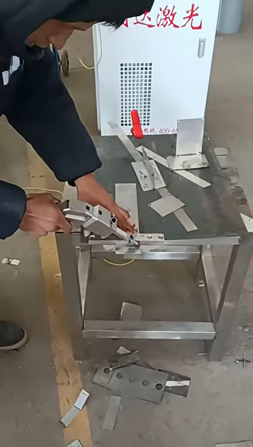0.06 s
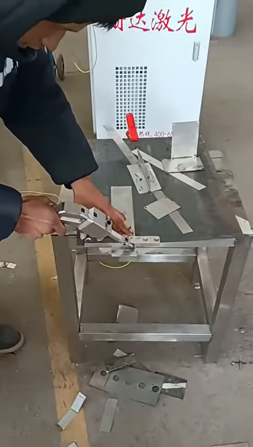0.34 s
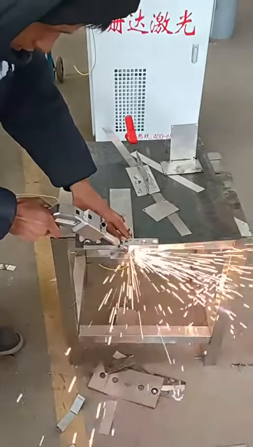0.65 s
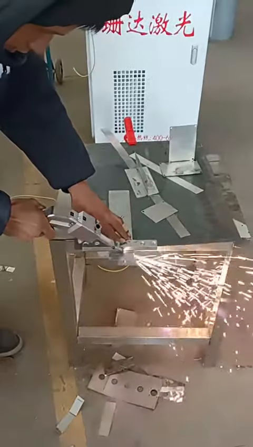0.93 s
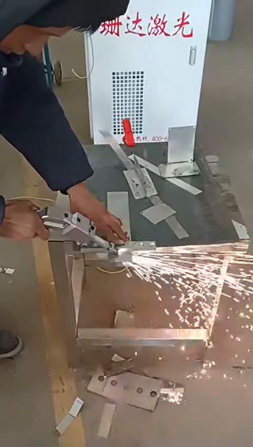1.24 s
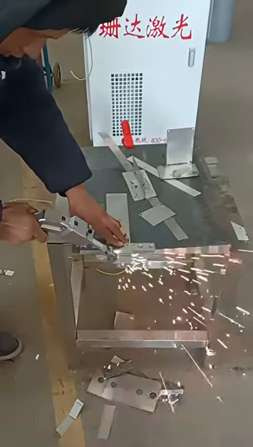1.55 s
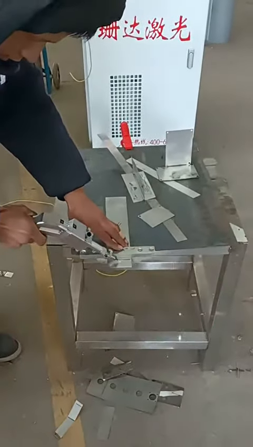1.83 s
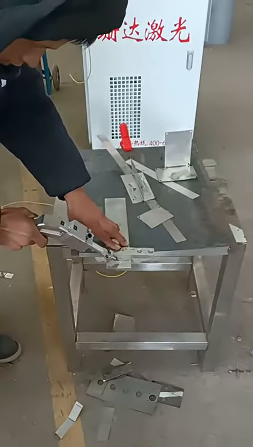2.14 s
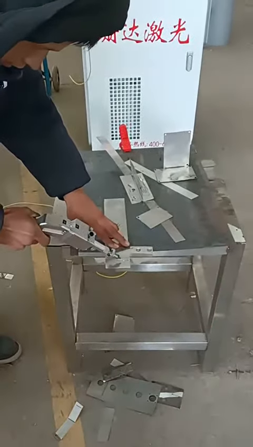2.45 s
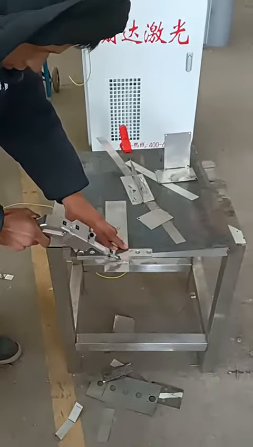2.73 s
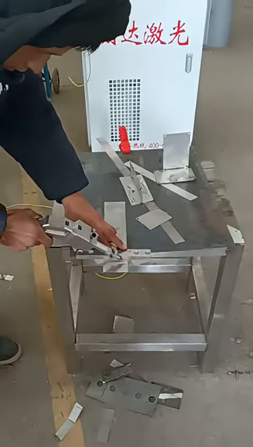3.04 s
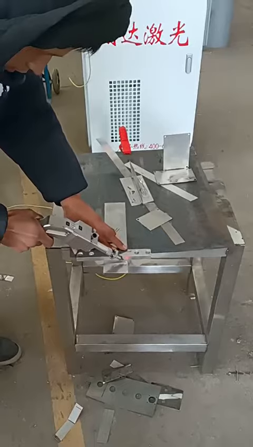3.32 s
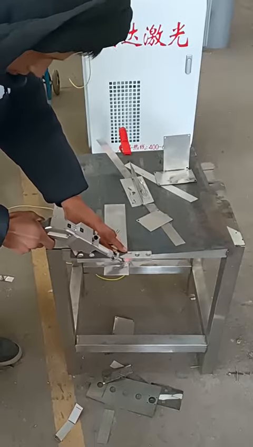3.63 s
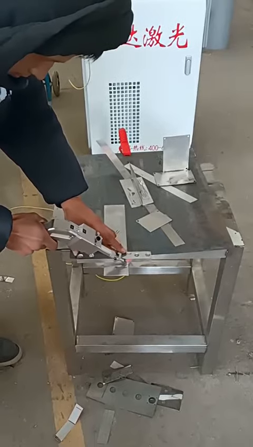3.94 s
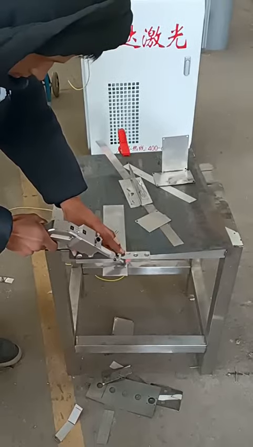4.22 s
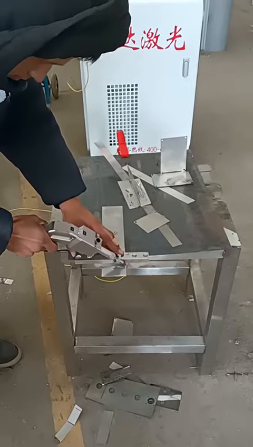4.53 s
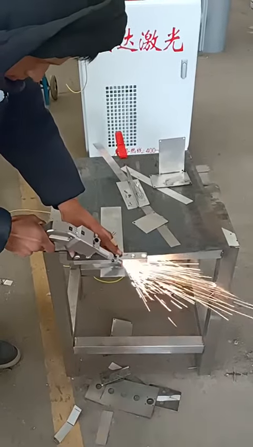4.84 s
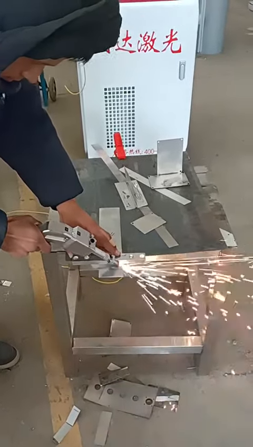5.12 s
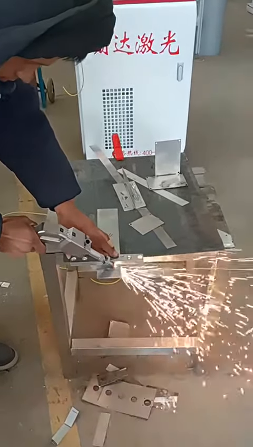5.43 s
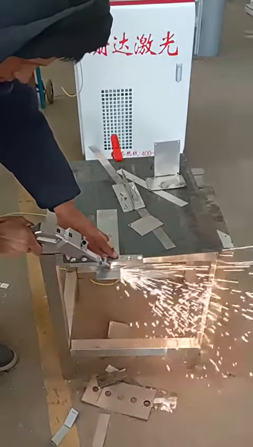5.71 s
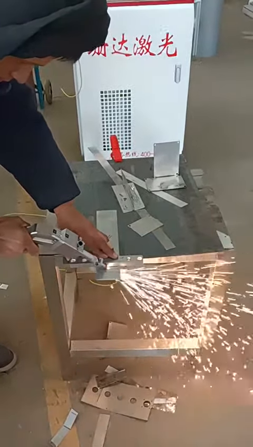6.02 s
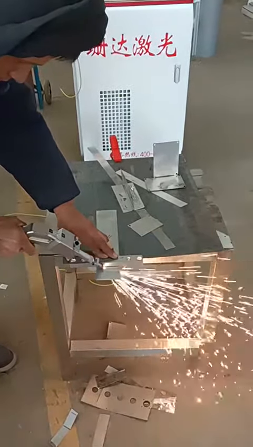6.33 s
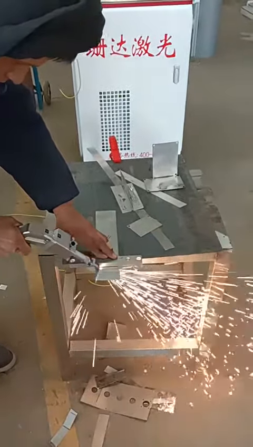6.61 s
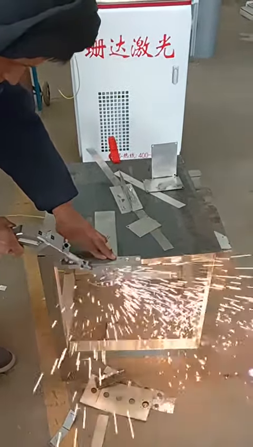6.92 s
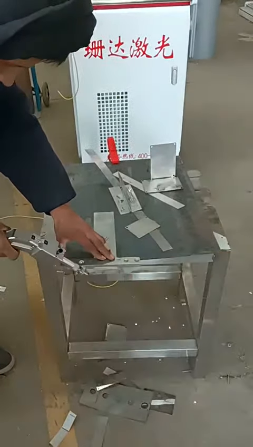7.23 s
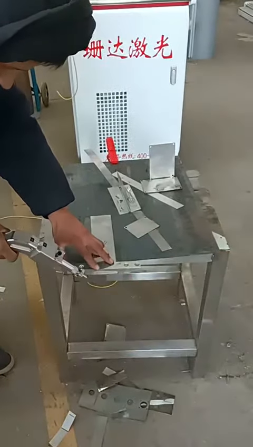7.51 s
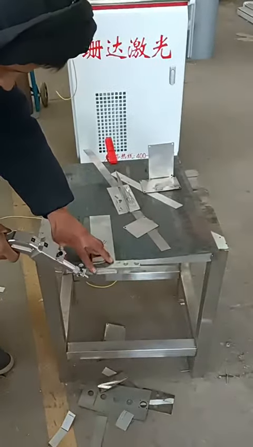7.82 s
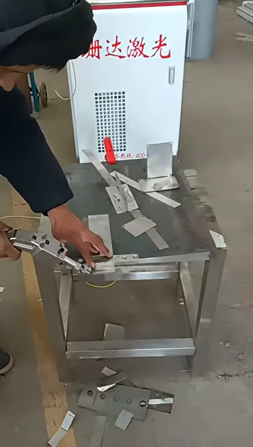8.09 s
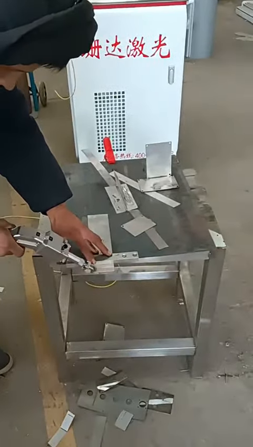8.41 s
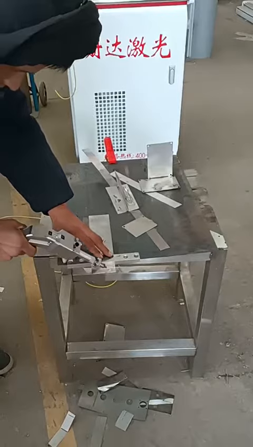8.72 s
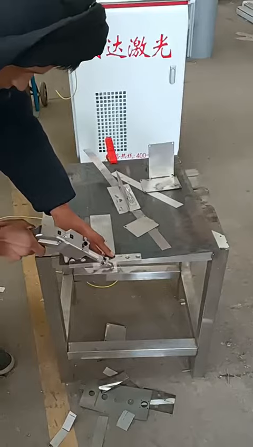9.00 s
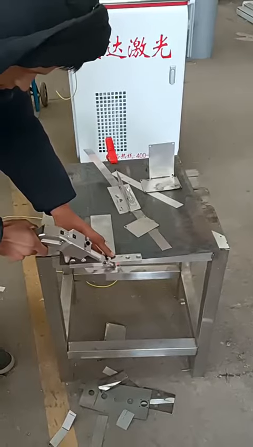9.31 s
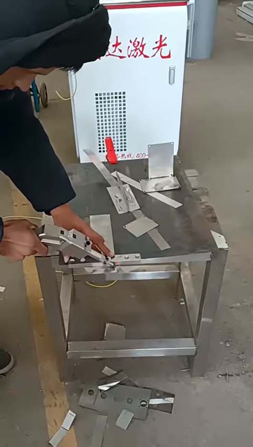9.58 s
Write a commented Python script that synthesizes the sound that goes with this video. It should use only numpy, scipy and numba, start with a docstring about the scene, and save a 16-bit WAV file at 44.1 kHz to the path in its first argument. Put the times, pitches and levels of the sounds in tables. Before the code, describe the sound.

A handheld laser cutter hisses loudly through steel in two passes, then a metal offcut clatters onto concrete over a steady workshop hum.

```python
"""On a workshop bench, a handheld laser cuts a steel strip in two passes, heard from a phone above it.
Turbulent assist gas hisses from the nozzle, roars through the melt, excites the resonances of the kerf
and throws sparks. The freed offcut drops on the concrete and rings in its bending modes as it bounces,
ducking the phone's limiter. The laser's cooler hums throughout."""
import sys
import numpy as np
from scipy import signal
from scipy.fft import rfft, irfft, next_fast_len
from scipy.io import wavfile
from scipy.ndimage import uniform_filter1d, minimum_filter1d
from numba import njit

SR = 44100
rng = np.random.default_rng(int(sys.argv[2]) if len(sys.argv) > 2 else 0)


def output_pcm(signal):
    """Save a mono or channel-first signal as 16-bit PCM at the path in sys.argv[1].

    Samples are clipped to [-1, 1] before scaling.
    """
    pcm = np.clip(np.atleast_2d(signal).T, -1, 1) * 32767
    wavfile.write(sys.argv[1], SR, np.round(pcm).astype(np.int16))


N = 429975
T, FREQ = np.arange(N) / SR, np.maximum(np.fft.rfftfreq(next_fast_len(N + SR, True), 1 / SR), 1)

# Levels in the tables are relative.
# spectrum of the cooler fans and workshop air: frequency_hz, density_db
FAN_SPECTRUM = [(25, -23), (70, -8.5), (150, -1), (270, -0.5), (450, -14.5), (620, -15), (790, -17.5),
                (1030, -16), (1500, -23.5), (2200, -24), (3200, -32.5), (4650, -24), (5500, -33),
                (7500, -62), (16000, -66.5)]
# lines of the compressor hum: pitch_hz, level_db
HUM_LINES = [(108.6, -51.5), (108.3, -68.5), (101, -62), (180, -63.5)]
# colour difference of the two microphone ports: frequency_hz, left_minus_right_db
PORT_BALANCE = [(100, 0), (200, -3), (650, 1), (1300, -1), (2300, -5.5), (3100, -0.5), (4200, -8.5),
                (5200, -15), (6200, -3), (7500, -2), (8800, 9.5), (11000, -2), (15000, 2)]
# likeness of left and right for near sources: frequency_hz, coherence_ratio
NEAR_COHERENCE = [(200, 1), (700, 0.7), (1500, 0.44), (4000, 0.66), (9000, 0.38)]
# likeness of left and right for the diffuse hall: frequency_hz, coherence_ratio
DIFFUSE_COHERENCE = [(30, 0.83), (100, 0.92), (290, 0.95), (640, 0.46), (1500, 0.02), (5000, 0)]
# spectrum of the trigger click: frequency_hz, density_db
TRIGGER_SPECTRUM = [(200, -9), (550, 3), (1200, -8), (2300, 5), (3100, -6), (4200, -3), (6000, -15),
                    (9000, -28), (16000, -45)]
# touches of the nozzle on the strip: start_s, level_db, decay_s
NOZZLE_TOUCHES = [(2.68, -57, 0.075), (2.769, -57, 0.023), (3.392, -52.5, 0.026), (8.777, -61, .008)]
# bending modes of the offcut: pitch_hz, level_db, t60_s
OFFCUT_MODES = [(1201, -22, 0.82), (1518, -17, 0.14), (1790, -23, 0.26), (1940, -17.5, 0.14),
                (2100, -20, 0.15), (2173, -4.5, 0.15), (2372, -2.5, 0.11), (2487, -0.5, 0.13),
                (2790, -8.5, .2), (3114, -1.5, 0.32), (3200, -2.5, 0.18), (3400, -2, 0.39),
                (3500, 3.5, 0.18), (3560, -3, 0.86), (4020, 1.5, 0.15), (4100, 0, 0.11), (4270, 0.5, 0.17),
                (4415, -2, 0.13), (4620, -9, 0.2), (4780, -1.5, 0.18), (4860, -8, 0.4), (4950, -5, 0.18),
                (5270, -2.5, 0.16), (5710, -3, 0.18), (6015, -4.5, 0.25), (6580, -14, 0.2),
                (6950, -21, 0.17), (8850, -30.5, 0.32)]
# landings of the offcut: start_s, level_db, chatter_decay_s, favoured_mode_hz, mode_rise_db
LANDINGS = [(7.191, -4, 0.0092, 5710, 6), (7.201, -7, 0.025, 3200, 7), (7.213, -13, 0.027, 4780, 8),
            (7.246, -5, 0.037, 4100, -1), (7.276, -11, 0.018, 2372, 14.5), (7.285, -22, 0.015, 1201, 26),
            (7.307, -15, 0.02, 3400, 18), (7.318, -7.5, 0.028, 4100, 5), (7.338, -14.5, 0.021, 2487, 7),
            (7.357, -14, 0.02, 3400, 16), (7.372, -11.5, 0.018, 4780, 9), (7.424, -34.5, 0.007, 1790, 41),
            (7.477, -25, 0.02, 6015, 27), (7.484, -17, 0.015, 3560, 22), (7.49, -6.5, 0.029, 2487, 4.5),
            (7.516, -18, 0.023, 5270, 11), (7.56, -16.5, 0.031, 3560, 16.5),
            (7.595, -25, 0.035, 4780, 20.5), (7.716, -20, 0.062, 3114, 10.5),
            (7.729, -22.5, 0.029, 2372, 12), (7.742, -27, 0.026, 6015, 25), (7.762, -20, 0.048, 3114, 3),
            (7.797, -21.5, 0.028, 4270, 10)]
# spectrum of a steel edge scraping concrete: frequency_hz, density_db
SCRAPE_SPECTRUM = [(30, -70.5), (500, -30), (1200, -13), (1800, -5), (2200, 2), (2800, 3.5), (3300, 12.5),
                   (4700, 13.5), (5700, 7), (6600, -3), (8000, -18.5), (11000, -29), (16000, -41)]
# spectrum of the spark fizz, with the microphone's high sheen near 15 kHz: frequency_hz, density_db
FIZZ_AND_SHEEN = [(100, -50), (2000, -18.5), (5000, -8.5), (9000, 15.5), (10500, 8.5), (12500, 2),
                  (13800, -5.5), (15000, 14), (16000, -13.5)]
# sparks thickening into showers: centre_s, rise_db, half_length_s
SPARK_SHOWERS = [(0.44, 9.7, 0.18), (0.83, 20, 0.19), (1.86, 16, 0.041), (5.45, 17.2, 0.36),
                 (7.1, 16.2, 0.61)]
# the two passes: valve_opens_s, beam_bites_s, beam_leaves_s, valve_shuts_s
CUT_PASSES = [(0.267, 0.319, 1.91, 1.977), (4.695, 4.852, 6.875, 7.39)]
# uneven guiding by the hand, one table per pass: time_s, hiss_db, roar_db
HAND_GUIDING = [
    [(0.42, -21, -29), (0.578, -24.5, -28), (0.7, -22.5, -32.5), (1.046, -18.5, -39.5), (1.408, -21, -34),
     (1.558, -19.5, -36), (1.622, -17.5, -27.5), (1.834, -18, -30.5), (1.88, -19.5, -41)],
    [(4.8, -23.5, -26.5), (4.94, -20.5, -26), (5.002, -19.5, -26.5), (5.274, -22.5, -29),
     (5.508, -19.5, -28.5), (5.614, -19.5, -37), (6.0, -19.5, -37.5), (6.08, -20, -32.5),
     (6.598, -24.5, -30.5), (6.85, -24.5, -33)],
]
# the nozzle pressed flat, choking the bleed: centre_s, change_db, half_length_s
BLEED_CHOKES = [(2.87, -17, 0.038), (3.49, -9, 0.035)]
# ripples that the steel bench top lays on the spectrum: frequency_hz, rise_db
BENCH_RIPPLES = [(797, 5.5), (1040, 4.5), (1185, 3), (1486, 7), (1723, 3.5), (2090, 1.5), (2340, 2),
                 (3020, 6), (3338, 6.5), (3625, 7), (3945, 10), (4235, 8), (4600, 7.5), (5025, 7),
                 (5345, 7), (5620, 5.5), (5810, 4.5), (6288, 2.5), (6611, 7), (6920, 2.5)]
# air resonance of the lengthening cut, one table per pass: time_s, pitch_hz, level_over_jet_db
CUT_RESONANCE = [
    [(0.65, 7800, -27), (0.88, 7300, -12), (1.1, 6700, -18), (1.28, 4200, -11), (1.68, 3650, -14.5),
     (1.88, 2950, -13.5)],
    [(5.2, 7400, -28), (5.48, 6900, -13), (5.78, 6400, -9), (6.02, 4200, -8.5), (6.18, 3350, -12),
     (6.42, 2950, -13.5), (6.6, 1465, -10.5), (6.85, 1102, -16.5)],
]
# cavities that change size as the nozzle travels: time_s, slot_pitch_hz, hollow_pitch_hz
CAVITY_PITCHES = [(0.4, 4940, 2350), (0.85, 5070, 2300), (1.25, 5100, 2190), (1.7, 5160, 2080),
                  (1.9, 5470, 2196), (4.85, 4490, 2387), (5.25, 4710, 2315), (5.5, 4740, 2200),
                  (5.75, 5510, 2300), (6.08, 5505, 2216), (6.6, 5330, 2100), (6.88, 5310, 1902),
                  (6.91, 4110, 1907), (7.0, 5210, 2196)]
# swells of the whistle as the jet lines up with the slot: centre_s, rise_db, half_length_s
WHISTLE_SWELLS = [(1.2, 5.4, 0.33), (1.86, 9.6, 0.13), (5.88, 7.6, 0.16), (6.72, 6.1, 0.2)]
# gas spits as the beam pierces and breaks through:
# start_s, level_db, decay_s, squeal_offset_db, spray_offset_db
GAS_SPITS = [(4.834, -16.5, 0.018, -16, -19), (6.889, -12, 0.011, 2.5, -29)]
# spectrum of the turbulence in the kerf: frequency_hz, density_db
ROAR_SPECTRUM = [(30, -33), (250, -12.5), (500, -10.5), (670, -12), (790, -6.5), (1450, -0.5), (2200, 1),
                 (2900, -3), (4000, -15), (6000, -29.5)]
# spectrum of the gas jet: frequency_hz, density_db
JET_SPECTRUM = [(30, -66), (700, -27), (1400, -22), (2250, -7.5), (2750, -10.5), (3200, -11.5),
                (3550, -6.5), (4300, 0), (5300, 1), (6000, -2.5), (7000, -11.5), (8200, -20.5),
                (9500, -22.5), (11000, -46), (16000, -33)]

MELT_S, CLEAR_S = 0.034, 0.012  # time constants: the melt builds under the beam and clears behind it


def undb(db):
    """Amplitude ratio of a level in decibels."""
    return 10 ** (np.asarray(db) / 20)


def along(table):
    """Interpolation of rows (frequency_hz, value) on a log-frequency axis."""
    hz, value = np.transpose(table)
    return np.interp(np.log(FREQ), np.log(hz), value)


def transform(x):
    """Fourier transform, zero-padded to leave room for tails."""
    return rfft(x, 2 * (len(FREQ) - 1))


def colour(x, gain):
    """Linear filtering by a gain per frequency."""
    return irfft(transform(x) * gain)[..., :N]


def unit(x):
    """Normalisation to rms 1."""
    return x / np.sqrt(np.mean(x ** 2))


def noise():
    """Two uncorrelated white noises."""
    return rng.standard_normal((2, N))


def walk(rate_hz):
    """Random modulation: held values, smoothed twice, with a spread near 1."""
    hold = int(SR / rate_hz)
    steps = np.repeat(rng.standard_normal(N // hold + 1), hold)
    return 1.55 * uniform_filter1d(uniform_filter1d(steps, hold), hold)[:N]


def since(start_s):
    """Elapsed seconds, zero before the start."""
    return np.maximum(T - start_s, 0)


def bursts(table, attack_s=.002):
    """Power sum of exponential decays, from rows (start_s, level_db, decay_s)."""
    return np.sqrt(sum((undb(db) * np.exp(-since(s) / decay) * np.minimum(since(s) / attack_s, 1)) ** 2
                       for s, db, decay, *_ in table))


def swells(table):
    """Gaussian level changes in dB, from rows (centre_s, rise_db, half_length_s)."""
    return sum(db * np.exp(-.5 * ((T - s) / half) ** 2) for s, db, half in table)


def sputter(x, depth_db, rate_hz, bands=7):
    """Independent amplitude modulation of half-octave bands from 600 Hz upward."""
    octaves, spectrum, out = np.log2(FREQ / 600), transform(x), x
    for k in range(bands):
        band = irfft(spectrum * np.maximum(1 - np.abs(2 * octaves - k), 0))[:, :N]
        out = out + band * (undb(depth_db * walk(rate_hz)) - 1)
    return unit(out)


@njit
def resonate(x, hz, width_hz):
    """Second-order resonance whose centre and bandwidth move from sample to sample."""
    y, band_state, low_state = np.empty(len(x)), 0., 0.
    for i in range(len(x)):
        g, damping = np.tan(np.pi * hz[i] / SR), width_hz[i] / hz[i]
        band = (band_state + g * (x[i] - low_state)) / (1 + g * (g + damping))
        band_state, low_state = 2 * band - band_state, low_state + 2 * g * band
        y[i] = damping * band
    return y


def cavity(hz, width_hz, ripple_db):
    """Forced resonance: turbulence drives a moving cavity at even power, coloured by the bench top."""
    width_hz = width_hz * np.ones(N)
    rung = np.array([resonate(resonate(x, hz, width_hz), hz, width_hz) for x in noise()])
    return unit(colour(rung / np.sqrt(width_hz), undb(ripple_db)))


def workshop(x, wet_db, t60_s, early_db=-11.5, early_s=.008, damp_hz=7000, gap_s=0.011):
    """Reverberation: early reflections from frame and floor, then the hard hall's diffuse tail."""
    t = T[:SR]
    early = rng.standard_normal((2, SR)) * np.exp(-t / early_s) * (t > early_s / 2)
    tail = rng.standard_normal((2, SR)) * undb(-60 * t / t60_s) * (t > gap_s)
    echoes = undb(early_db) * early / np.linalg.norm(early[0])
    echoes += undb(wet_db) * tail / np.linalg.norm(tail[0])
    return colour(x, 1 + transform(echoes) / np.hypot(1, (FREQ / damp_hz) ** 2))


def ports(pair, coherence, lag_ms):
    """Partial coherence: two signals mix as mid and side into left and right; the right lags."""
    like, tilt = np.clip(along(coherence), -1, 1), undb(along(PORT_BALANCE) / 2)
    mid, side = transform(pair) * np.sqrt([1 + like, 1 - like])
    delay = np.exp(-2j * np.pi * FREQ * lag_ms / 1000)
    norm = np.sqrt((tilt ** 2 + tilt ** -2 + 1) / 2)
    return irfft(np.array([(mid + side) * tilt, (mid - side) / tilt * delay]) / norm)[:, :N]


def cooler(air_db=-48.5, waver_db=1.5, rumble_db=1.85, rumble_hz=400, load_db=3):
    """Fans make broadband noise; close compressor lines beat, and swell under load in each pass."""
    air = unit(colour(noise(), undb(along(FAN_SPECTRUM)))) * undb(air_db)
    rumble = colour(air, 1 / (1 + (FREQ / rumble_hz) ** 4))
    rush = air - rumble
    fans = rumble * undb(rumble_db * walk(22)) + np.std(rush) * sputter(rush, depth_db=1.5, rate_hz=5.5)
    running = sum(1. * (T > opens) * (T < shuts) for opens, _, _, shuts in CUT_PASSES)
    load = uniform_filter1d(running, SR // 4)
    hum = sum(np.sqrt(2) * undb(db + waver_db * walk(9)) * np.sin(2 * np.pi * hz * T + .25 * walk(5.1))
              for hz, db in HUM_LINES)
    return fans + np.array([[1], [0]]) * hum * undb(load_db * load)  # hum in the mid signal only


def handling(click_db=-48, lead_s=0.039, decay_s=0.006):
    """Contact transients: the nozzle scratches the steel; the trigger clicks before the valve opens."""
    scratches = colour(noise() * bursts(NOZZLE_TOUCHES), unit(undb(along(JET_SPECTRUM))))
    clicks = bursts([(opens - lead_s, click_db, decay_s) for opens, *_ in CUT_PASSES])
    return scratches + colour(noise() * clicks, unit(undb(along(TRIGGER_SPECTRUM))))


def offcut(ring_db=-1, scrape_db=-5.5, blow=0.57, rattle=0.57, grip_s=0.0022, strike_db=2.6,
           detune=0.002, choke_s=0.028, kept=0.85, rest_s=7.815, settle_s=0.051):
    """Impact excites bending modes: each landing is a blow, then tiny contacts that rattle and scrape."""
    t = T[:SR // 2]
    hz, db, t60 = np.transpose(OFFCUT_MODES)[:, :, None]
    decays = undb(db) / np.sqrt(t60) * undb(-60 * t / t60) * np.minimum(t / 0.0017, 1)
    decays = decays * np.sqrt(2) / np.linalg.norm(decays)
    chatter = noise() * undb(1.1 * walk(250))
    ring = np.zeros((2, N))
    for start_s, blow_db, chatter_s, favoured_hz, rise_db in LANDINGS:
        # a new edge lands each time: other modes speak, slightly detuned
        favour_db = rise_db * (np.arange(len(hz)) == np.argmin(np.abs(hz - favoured_hz)))
        weights = undb(favour_db + strike_db * rng.uniform(-1.3, 1, len(hz)))
        phases = np.exp(2j * np.pi * rng.random(len(hz)))
        modes = decays * np.exp(2j * np.pi * hz * (1 + detune * rng.standard_normal(hz.shape)) * t)
        response = ((weights * phases) @ modes).imag[None]
        span = slice(int(start_s * SR), int(start_s * SR) + len(t))
        force = rattle * chatter[:, span] * np.exp(-t / chatter_s) * (1 - np.exp(-t / grip_s))
        force[0, 0] += blow * np.sqrt(chatter_s * SR / 2)  # the first contact is the hardest
        ring *= kept + (1 - kept) * np.exp(-since(start_s) / choke_s)  # contact chokes part of the ring
        ring[:, span] += undb(blow_db) * signal.fftconvolve(force, response, axes=1)[:, :len(t)]
    damping = np.exp(-since(rest_s) / settle_s)  # it lies flat and the floor damps it
    scrape = colour(chatter * bursts(LANDINGS, attack_s=0.0016), unit(undb(along(SCRAPE_SPECTRUM))))
    return undb(ring_db) * ring * damping, undb(scrape_db) * scrape * damping


def hose_bleed(start_db=-56, fall_db_per_s=8.5, leak_db=-74.5):
    """Pressure relaxation: the flow left after each pass decays to a steady leak."""
    hose = sum((T > shuts) * undb(start_db - fall_db_per_s * since(shuts)) for *_, shuts in CUT_PASSES)
    return np.hypot(hose, undb(leak_db)) * undb(swells(BLEED_CHOKES))


def gas_flow(opens, bites, leaves, shuts, guiding, jet_db=0.77, kerf_db=-1.44, free_jet_db=-4.5,
             fill_db=-40.5, fill_s=0.044, vent_db_per_s=125, entry_s=0.6, exit_s=0.17):
    """Pressure and melt build and relax, setting one pass's jet strength, roar strength and depth."""
    times, *levels = np.transpose(guiding)
    hiss_db, roar_db = (np.interp(T, times, db) for db in levels)
    pressure_db = fill_db * np.exp(-since(opens) / fill_s) - vent_db_per_s * since(shuts)
    melt = (1 - np.exp(-since(bites) / MELT_S)) * np.exp(-since(leaves) / CLEAR_S)
    # without melt the jet blows freely and more softly
    jet = (T > opens) * undb(pressure_db + jet_db + hiss_db + free_jet_db * (1 - melt))
    # the roar deepens near the edges of the strip
    edge_db = 4.5 * np.exp(-np.abs(T - bites) / entry_s) + 10 * np.exp(-np.abs(T - leaves) / exit_s)
    return jet, melt * undb(kerf_db + roar_db), edge_db


def sparks(jet, level_db=-37, pops_per_s=4000, flicker_db=2):
    """Shot noise: burning steel droplets pop at very uneven sizes; the microphone adds a high sheen."""
    size = undb(1.7 * rng.exponential(size=N))
    pops = (rng.random(N) < pops_per_s / SR) * size * noise()
    fizz = unit(colour(pops, undb(along(FIZZ_AND_SHEEN)))) * undb(flicker_db * walk(12))
    sprays = bursts([(s, db + spray, decay) for s, db, decay, _, spray in GAS_SPITS], attack_s=.004)
    return fizz * (jet * undb(level_db + swells(SPARK_SHOWERS)) + sprays)


def lengthening_cut(jet, ripple_db, width_ratio=0.27, drift=0.023, flutter_db=2.5):
    """A longer air cavity resonates lower: the cut's pitch sinks until the beam leaves the steel."""
    times, hz, db = np.transpose([row for table in CUT_RESONANCE for row in table])
    centre_hz = np.exp(np.interp(T, times, np.log(hz))) * (1 + drift * walk(12))
    in_steel = sum((T > bites) * np.exp(-since(leaves) / CLEAR_S) for _, bites, leaves, _ in CUT_PASSES)
    resonance = cavity(centre_hz, width_ratio * centre_hz, ripple_db)
    return resonance * jet * in_steel * undb(np.interp(T, times, db) + flutter_db * walk(35))


def slot_whistle(jet, pitch_hz, ripple_db, level_db=-10, width_hz=590, drift=0.015, flutter_db=1.1):
    """Flow-driven resonance: the slot sings under the jet and squeals at each spit."""
    slot = cavity(pitch_hz * (1 + drift * walk(16)), width_hz, ripple_db)
    squeals = bursts([(s, db + squeal, decay) for s, db, decay, squeal, _ in GAS_SPITS], attack_s=0.0057)
    return slot * (jet * undb(level_db + swells(WHISTLE_SWELLS) + flutter_db * walk(50)) + squeals)


def kerf_roar(kerf, stray, depth_db, hollow_hz, ripple_db, slug_db=0.8, rasp_hz=700, treble_hz=1800):
    """Confined turbulence: gas churns in the hollow kerf, modulated by uneven slugs of melt."""
    slugs = 0.82 * walk(40) + 0.73 * walk(300)
    churn = sputter(colour(noise(), undb(along(ROAR_SPECTRUM) + ripple_db)), depth_db=2.0, rate_hz=36)
    hollow = undb(-4.5) * cavity(hollow_hz * (1 + 0.045 * walk(14)), width_hz=420, ripple_db=ripple_db)
    low = colour(churn, 1 / (1 + (FREQ / treble_hz) ** 6))
    rumble = colour(churn, 1 / (1 + (FREQ / rasp_hz) ** 16))
    rasp = (low - rumble) * undb(depth_db / 2)
    treble = (churn - low + hollow) * undb(-depth_db / 2)
    return (rumble + rasp + treble) * np.hypot(kerf * undb(slug_db * slugs), stray)


def jet_hiss(flow, ripple_db, flutter_db=0.68):
    """Turbulent jet noise: the nozzle hisses with the flow and spits as the beam breaks through."""
    hiss = unit(colour(noise(), undb(along(JET_SPECTRUM) + ripple_db)))
    return hiss * (flow * undb(flutter_db * walk(60)) + bursts(GAS_SPITS, attack_s=0.0022))


def cutting(tremor_db=0.65, graze_db=-16, seep_db=-4, mid_cut_depth_db=-5):
    """Aerodynamic sound: one gas flow drives the hiss, roar, resonances and spark spray."""
    jet, kerf, edge_db = sum(np.array(gas_flow(*timing, guiding))
                             for timing, guiding in zip(CUT_PASSES, HAND_GUIDING))
    jet, bleed = jet * undb(tremor_db * walk(9)), hose_bleed()
    stray = jet * undb(graze_db) + bleed * undb(seep_db)  # gas rushes a little even with the beam off
    times, *pitches = np.transpose(CAVITY_PITCHES)
    slot_hz, hollow_hz = (np.interp(T, times, hz) for hz in pitches)
    ripple_db = sum(db * np.exp(-.5 * ((FREQ - hz) / min(62, 0.037 * hz)) ** 2)
                    for hz, db in BENCH_RIPPLES)
    hiss = jet_hiss(np.hypot(jet, bleed), ripple_db)
    roar = kerf_roar(kerf, stray, mid_cut_depth_db + edge_db, hollow_hz, ripple_db)
    whistle = slot_whistle(jet, slot_hz, ripple_db)
    return hiss + roar + whistle + lengthening_cut(jet, ripple_db) + sparks(jet)


def scene():
    """Superposition: bench and floor reach the phone from different sides, over the diffuse cooler."""
    bench = workshop(undb(-1.05) * cutting() + handling(), wet_db=-13.5, t60_s=0.87)
    ring, scrape = offcut()
    floor = workshop(ring, wet_db=-17.0, t60_s=0.64, damp_hz=5000)
    floor += workshop(scrape, wet_db=-8.5, t60_s=0.97)
    near = ports(bench, NEAR_COHERENCE, lag_ms=0.051) + ports(floor, NEAR_COHERENCE, lag_ms=-0.11)
    return near + ports(cooler(), DIFFUSE_COHERENCE, lag_ms=0)


@njit
def peak_follower(x, release):
    """Envelope detection with instant attack and exponential release."""
    out, peak = np.empty(len(x)), 0.
    for i in range(len(x)):
        peak = max(x[i], peak * release)
        out[i] = peak
    return out


def record(dry, ceiling=0.74, release_s=0.034, cutoff_hz=15850):
    """Peak limiting: the phone ducks everything under the loudest peaks; a low-pass cuts the top."""
    peak = peak_follower(np.abs(dry).max(axis=0), np.exp(-1 / (release_s * SR)))
    gain = uniform_filter1d(minimum_filter1d(ceiling / np.maximum(peak, ceiling), size=64), size=64)
    return signal.sosfilt(signal.ellip(10, .2, 80, cutoff_hz, fs=SR, output="sos"), dry * gain)


dry = scene()
out = record(dry)
output_pcm(out)
```